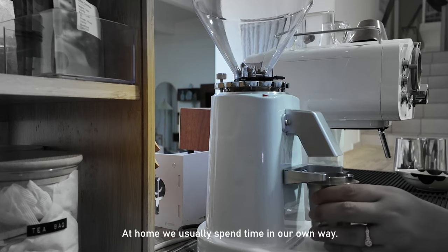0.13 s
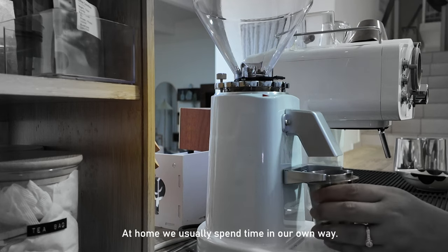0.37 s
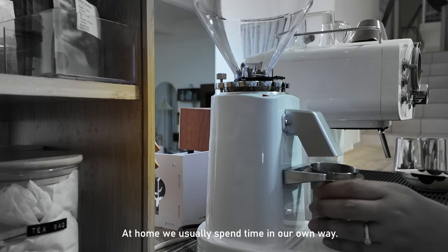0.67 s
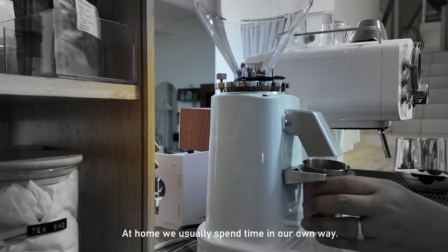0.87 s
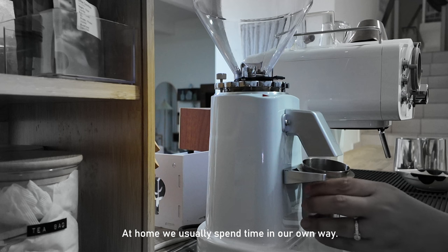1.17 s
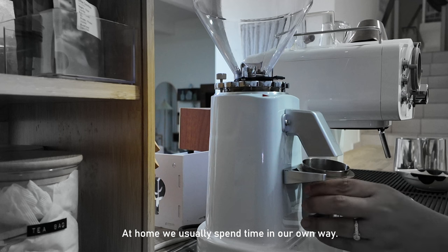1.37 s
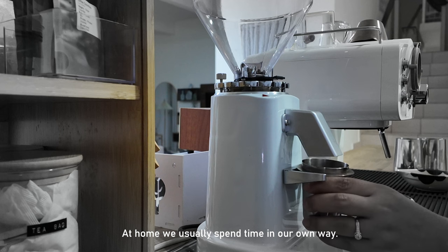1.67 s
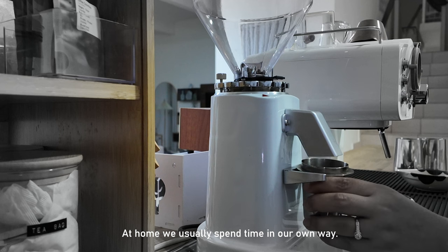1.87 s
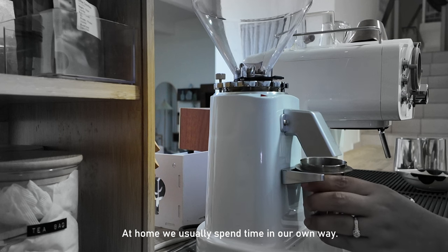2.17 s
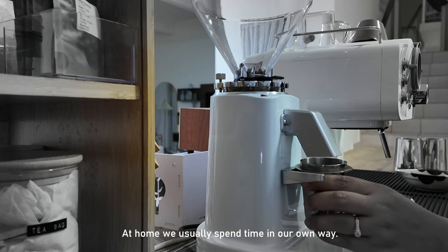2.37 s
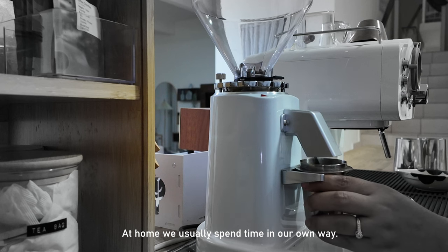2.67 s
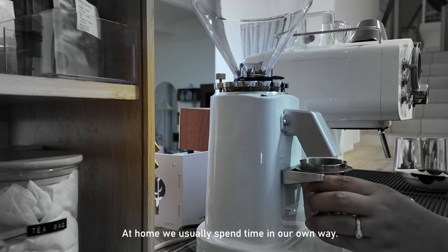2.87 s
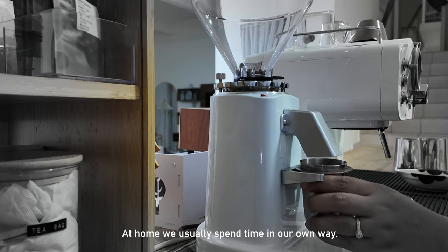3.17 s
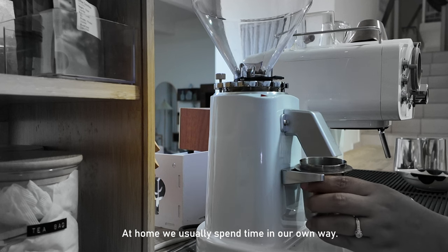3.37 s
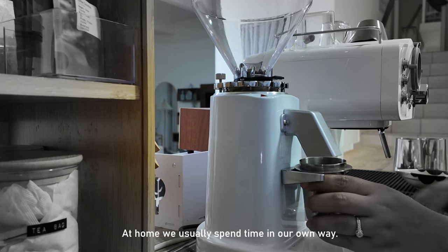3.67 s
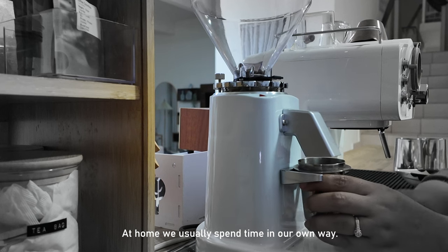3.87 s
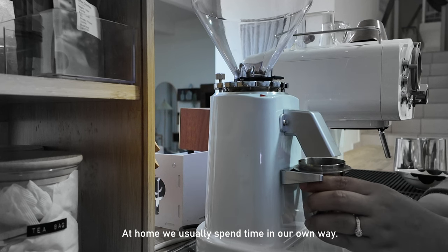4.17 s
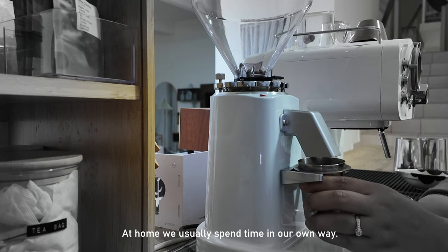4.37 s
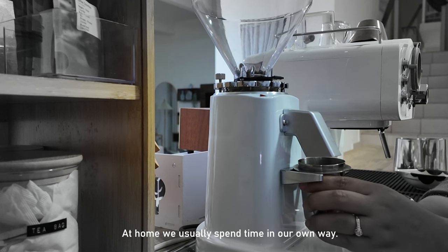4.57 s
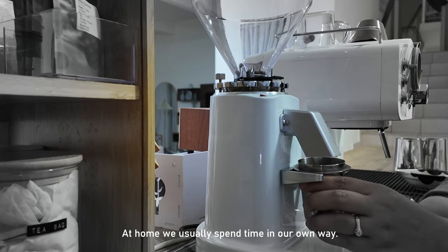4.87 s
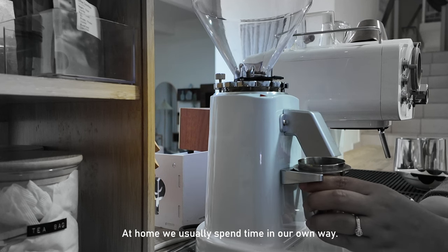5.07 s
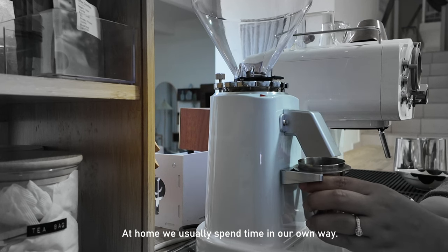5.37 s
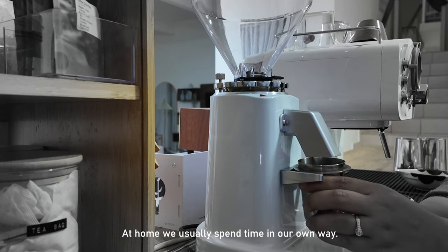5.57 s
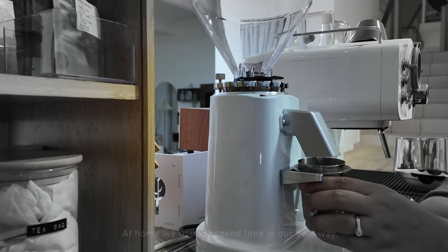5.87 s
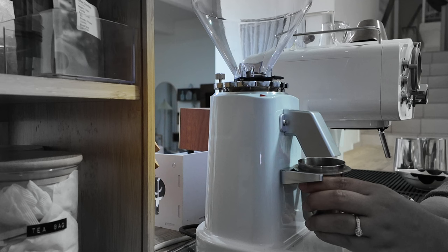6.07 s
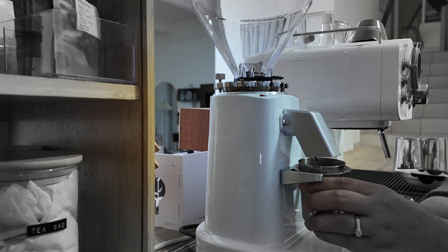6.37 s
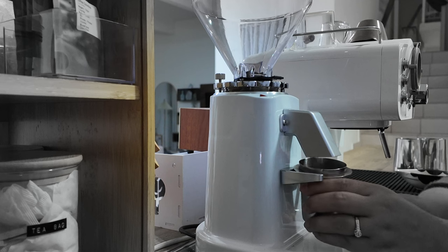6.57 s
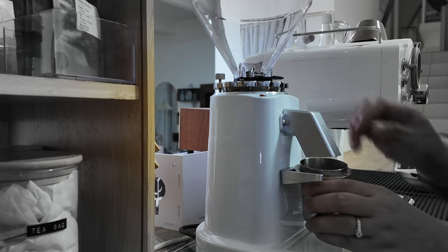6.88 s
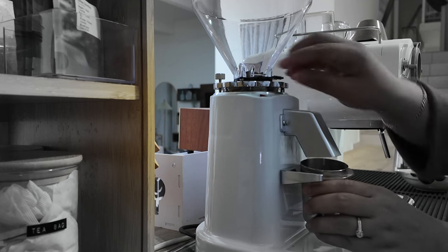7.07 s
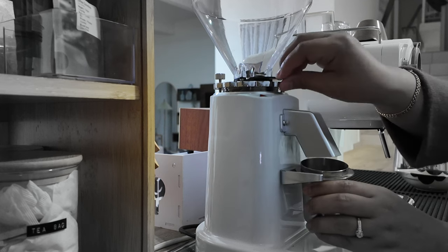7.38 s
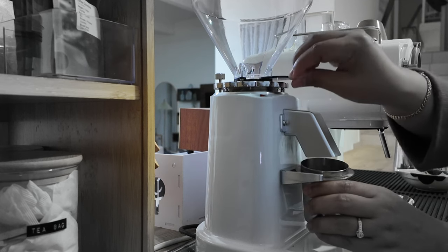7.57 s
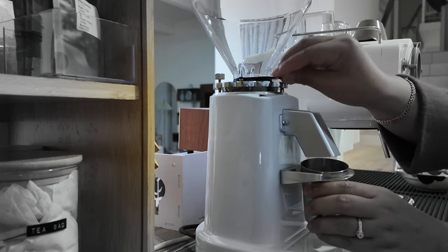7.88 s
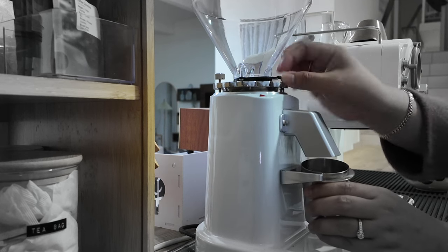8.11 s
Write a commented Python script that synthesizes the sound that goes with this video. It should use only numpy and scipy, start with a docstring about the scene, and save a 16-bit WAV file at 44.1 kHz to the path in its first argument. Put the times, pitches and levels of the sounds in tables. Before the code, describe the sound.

Close stereo view of a home kitchen with low rumble and thin hiss. A steel filter holder taps, then clunks loudly against a grinder's fork. A sharp knock starts a very short, loud grind with cracking beans; after a pause a longer run roars and whines, then coasts down quickly. Finally, a hand turns the grinder's collar with delicate clicks and dry scrapes.

```python
"""Burr grinder on a kitchen counter

An electric grinder runs twice: beans crack between the burrs as filtered noise and rough sine bursts, the teeth
whine at a pitch that follows the shaft, and the motor hums at twice the mains rate. A steel filter holder knocks
as decaying modes over noise; at the end a hand turns the clicking, scraping grind collar. Soft rumble and hiss
run throughout; decaying noise makes the room's answer to the grinding and the handling."""
import sys
import numpy as np
from scipy import signal
from scipy.fft import rfft, irfft, next_fast_len
from scipy.io import wavfile
from scipy.ndimage import uniform_filter1d, map_coordinates

SR = 44100
rng = np.random.default_rng(int(sys.argv[2]) if len(sys.argv) > 2 else 0)


def to_wav(s):
    """Save 16-bit WAV."""
    ch = np.atleast_2d(s).T  # columns
    pcm = np.round(np.clip(ch, -1, 1) * 32767)  # PCM
    wavfile.write(sys.argv[1], SR, pcm.astype(np.int16))


N = 363560
T = np.arange(N) / SR

# motor runs: (on [s], off [s], burrs stall [s])
RUNS = [(2.201, 2.577, 2.694), (3.897, 6.561, 6.635)]
# modes of the grind collar: (frequency [Hz], relative level [dB], t60 [s])
COLLAR_MODES = [(681, 1, 0.12), (848, 3, 0.086), (1100, 0.5, 0.12), (1966, 0.5, 0.11), (2440, 2.5, 0.16),
                (3700, -1.5, 0.094), (4380, -3, 0.054), (9520, -3.5, .06)]
FULL_TEETH_HZ = 2245  # mean tooth rate at full speed
CRACK_T60_S = 0.055  # noise in a contact


def amp(db):
    """Amplitude ratio of a level in dB."""
    return 10 ** (np.asarray(db) / 20)


def unit(x):
    """x scaled to an rms of 1."""
    return x / np.sqrt(np.mean(x ** 2) + 1e-20)


def along(points, hz):
    """Interpolates (frequency [Hz], value) points on a log frequency axis."""
    f, v = np.transpose(points)
    return np.interp(np.log(hz + 1), np.log(f + 1), v)


def wobble(rate_hz):
    """Smooth random curve with rate_hz knots a second."""
    knots = rng.standard_normal(int(N * rate_hz / SR) + 4)
    return map_coordinates(knots, [T * rate_hz])


def filtered(x, response):
    """x shaped by a complex response of frequency."""
    m = next_fast_len(N + SR)
    return irfft(rfft(x, m) * response(np.fft.rfftfreq(m, 1 / SR)), m)[..., :N]


def causal(gain):
    """Minimum-phase response with this gain, by folding the cepstrum."""
    cepstrum = irfft(np.log(gain + 1e-6))
    half = len(cepstrum) // 2
    cepstrum[1:half] *= 2
    cepstrum[half + 1:] = 0
    return np.exp(rfft(cepstrum))


def patchy(depth_db):
    """White noise with patches of random gain in time and frequency."""
    z = signal.stft(rng.standard_normal(N), nperseg=256)[2]
    field = uniform_filter1d(rng.standard_normal(z.shape), size=4, axis=0)
    field = uniform_filter1d(field, size=8, axis=1)
    return signal.istft(z * amp(depth_db * unit(field)), nperseg=256)[1][:N]


def air():
    """Drifting low household rumble, nearly mono, and a thin wide hiss."""
    # background drift: (time [s], rumble level [dB], hiss level [dB])
    drift = [(0.05, -36, -61), (0.4, -38, -62.5), (0.9, -37.5, -61.5), (1.9, -39, -62.5), (3.0, -40, -66.5),
             (3.45, -37.5, -61), (6.9, -39.5, -63), (7.35, -37, -60), (7.65, -36.5, -65), (8.2, -39, -60)]
    # spectra: (frequency [Hz], relative density [dB])
    rumble_spectrum = [(12, -77.5), (20, -48.5), (43, -33), (54, -18), (102, 4.5), (125, -8.5), (151, -3),
                       (229, -8.5), (256, -13), (335, -18), (524, -29.5), (743, -28.5), (900, -43.5),
                       (1170, -80.5), (1980, -120)]
    hiss_spectrum = [(290, -31.5), (500, -27), (748, -2.5), (863, -10.5), (969, -3), (1040, -4.5),
                     (1350, -3.5), (5670, -17), (15500, -27)]
    # stereo width: (frequency [Hz], side minus mid [dB])
    air_width = [(60, -32), (110, -31.5), (200, -22.5), (380, -12), (700, -7.5), (1290, -5), (2380, -2),
                 (4400, 2.5), (8120, -1), (15000, -3)]
    s, *levels = np.transpose(drift)
    rumble_db, hiss_db = (np.interp(T, s, db) for db in levels)
    rumble_db = rumble_db + 0.7 * wobble(5)
    out = 0
    for level_db, spectrum in ((rumble_db, rumble_spectrum), (hiss_db, hiss_spectrum)):
        shape = lambda hz: amp(along(spectrum, hz) + along(air_width, hz) * [[0], [1]])
        mid, side = filtered(rng.standard_normal((2, N)), shape)
        out = out + amp(level_db) * np.array([mid + side, mid - side]) / np.std(mid)
    return out


def struck(events, modes, crack_t60_s, ring_db, loose_hz, body_hz, sharp):
    """Contacts ring modes over a crack of noise, loose parts waver them; a tick band and a low body band colour it."""
    out, t = np.zeros(N + SR), np.arange(SR // 3) / SR
    hz = np.fft.rfftfreq(len(t), 1 / SR) + 1
    f, level_db, t60_s = np.transpose(modes)[:, :, None]
    body = 1 / np.sqrt((1 + (body_hz[0] / hz) ** 6) * (1 + (hz / body_hz[1]) ** 6))
    for s, tick_db, tick_hz, body_db in events:
        steps = rng.standard_normal((len(modes), len(t)))
        waver = np.cumsum(steps, axis=1) * np.sqrt(2 * np.pi * loose_hz / SR)  # phase walk
        ring = (amp(level_db - 60 * t / t60_s) * np.sin(2 * np.pi * f * t + waver)).sum(0)
        crack = amp(-60 * t / crack_t60_s) * rng.standard_normal(len(t))
        sound = (amp(ring_db) * ring + crack) * np.minimum(t / 0.00062, 1)
        tick = 1 / np.sqrt(1 + (sharp * (hz / tick_hz - tick_hz / hz)) ** 2)
        tick = tick / (1 + (hz / 15000) ** 4)
        colour = np.hypot(amp(tick_db) * tick, amp(body_db) * body)
        out[round(s * SR):][:len(t)] += irfft(rfft(sound) * causal(colour))
    return out[:N]


def filter_holder():
    """Steel filter holder knocking on fork and switch, ringing its modes."""
    # contacts: (time [s], tick gain [dB], tick pitch [Hz], body gain [dB])
    knocks = [(0.237, -10.5, 2040, -27.5), (0.242, -35, 3000, -37), (0.255, -29, 1600, -36),
              (0.535, -39, 1720, -32), (0.884, -5, 1810, -1.5), (0.897, -8.5, 2770, -15.5),
              (0.907, -24, 910, -25), (0.927, -13.5, 700, -19.5), (0.959, -33, 2800, -26),
              (0.994, -34.5, 2500, -19.5), (1.079, -43, 1900, -35), (1.133, -52, 1500, -33.5),
              (2.199, -7.5, 4530, -16), (3.513, -55, 2800, -41.5), (3.808, -43, 4550, -46),
              (3.899, -21, 2520, -20), (6.765, -24.5, 1500, -27)]
    # holder modes: (frequency [Hz], relative level [dB], t60 [s])
    holder_modes = [(228, 5.5, 0.11), (267.8, 2, 0.18), (333, -7, 0.23), (647, 0.5, 0.27), (732, 2, 0.17),
                    (961, -2.5, 0.15), (1382, -5, 0.13), (2290, -6.5, 0.076), (3400, -10.5, .07),
                    (3805, -11, 0.1), (7120, -5, 0.077)]
    return struck(knocks, holder_modes, CRACK_T60_S, ring_db=-13, loose_hz=15, body_hz=(200, 1000), sharp=1.9)


def answer(near_t60_s, late_db):
    """Room impulse response: short noise off close surfaces plus a tail whose treble dies sooner."""
    # tail decay: (frequency [Hz], t60 [s])
    tail_t60 = [(200, 1), (1000, 0.74), (4500, 0.57), (10000, 0.44)]
    hz, t, z = signal.stft(rng.standard_normal(SR), SR, nperseg=256)
    decay = amp(-60 * t / along(tail_t60, hz)[:, None])
    late = signal.istft(z * decay, SR, nperseg=256)[1][:SR]
    near = rng.standard_normal(SR) * amp(-60 * T[:SR] / near_t60_s)
    return near / np.linalg.norm(near) + amp(late_db) * late / np.linalg.norm(late)


def kitchen(x, other, hand):
    """Mid: direct sound and answer. Side, weak in bass: frequency-dependent lags, and reflections off the walls."""
    # stereo width: (frequency [Hz], side minus mid [dB])
    near_width = [(60, -29.5), (110, -29.5), (200, -22.5), (380, -6.5), (700, -1.5), (1290, 0), (2380, -2),
                  (4400, 0), (8120, -0.5), (15000, -1)]
    # stereo balance: (frequency [Hz], left minus right [dB])
    balance = [(60, 0), (1300, -.3), (2400, -2.5), (4400, -.5), (15000, -.5)]
    room_db, hand_wet_db = -11, -4.5  # hands are nearer than the burrs: less room in mid
    source = x + amp(hand_wet_db) * hand
    wet = signal.fftconvolve(source, answer(near_t60_s=0.045, late_db=-1.5))[:N]
    mid = x + hand + amp(room_db) * wet
    walls = signal.fftconvolve(other + hand, answer(near_t60_s=0.067, late_db=-15.0))[:N]
    knots = np.tanh(3 * rng.standard_normal(size=150))

    def share(hz):
        """Side gains of mid and walls; the walls take over above 2200 Hz."""
        lag = 1j * np.interp(hz, np.linspace(0, SR / 2, num=len(knots)), knots)
        angle = np.arctan(hz / 2200)
        return np.array([lag * np.cos(angle), np.sin(angle)]) * amp(along(near_width, hz))

    side = filtered(np.array([mid, walls]), share).sum(0)
    left_right = np.array([mid + side, mid - side])
    return filtered(left_right, lambda hz: amp(along(balance, hz) * [[0.5], [-0.5]]))


def motor():
    """The field pulls twice a mains cycle, giving hum and overtones; a jolt at switch-on swells them."""
    # hum partials: (frequency [Hz], mean peak level after the jolt [dB])
    partials = [(100, -28), (200, -33.5), (300, -41), (500, -55)]
    on = uniform_filter1d(sum((T > a) & (T < b) for a, b, _ in RUNS) * 1., size=900)
    hum = sum(amp(db + 0.4 * wobble(13.0)) * np.sin(2 * np.pi * hz * T + 0.099 * wobble(6.3))
              for hz, db in partials)
    inrush = sum(np.where(T > a, amp(-60 * np.abs(T - a) / 0.19), 0) for a, *_ in RUNS)
    return on * hum * (1 + 2.0 * inrush)


def shaft():
    """Mean tooth rate [Hz] and grinding amplitude: exponential spin-up and coast, with a louder first bite."""
    first_teeth_hz = 1480  # as the first beans are caught
    spin_up_s, coast_s = 0.058, 0.092  # time constants
    crush_db, attack_s = -15.5, 0.014
    bite_peak_db, bite_s = 6.5, 0.02
    coast_db_per_s, stall_db_per_s = 72.5, 360.5  # the stall adds its fall to the coast
    rate_hz, level = np.zeros(N), np.zeros(N)
    for on, off, stall in RUNS:
        since, coasting, stalled = (np.maximum(T - s, 0) for s in (on, off, stall))
        run_hz = FULL_TEETH_HZ - (FULL_TEETH_HZ - first_teeth_hz) * np.exp(-since / spin_up_s)
        rate_hz = np.where(T > on, run_hz * np.exp(-coasting / coast_s), rate_hz)
        bite_db = bite_peak_db / (1 + (since / bite_s) ** 8)
        fall_db = coast_db_per_s * coasting + stall_db_per_s * stalled
        level += np.minimum(since / attack_s, 1) ** 2 * amp(crush_db + bite_db - fall_db)
    return rate_hz, level


def case(hz):
    """Body gain: resonances on a broad slope, cut where the body is too small to radiate."""
    # resonances of hopper, chute and case: (frequency [Hz], width [Hz], relative level [dB])
    resonances = [(147.5, 42, -4), (250, 40, -9), (700, 77, -16), (1014, 34, 1), (1200, 76, -5.5),
                  (1370, 67, -10), (1754, 95, -4.5), (2070, 120, 0), (2418, 290, -10), (2960, 810, -17.5),
                  (3398, 51, -10), (4325, 160, -6.5), (4867, 100, -12), (9200, 260, -29.5),
                  (9200, 170, -20.5), (9960, 350, -21)]
    # slope between them: (frequency [Hz], relative density [dB])
    slope = [(20, -60), (40, -51.5), (65, -30.5), (110, -14), (290, -10), (520, -15.5), (695, 2.5),
             (890, -7.5), (1220, 2.5), (2260, 1.5), (3640, -10), (4480, -10), (5510, -16), (8000, -19),
             (14000, -22.5), (15500, -26.5)]
    foot_hz = 52
    peaks = sum(amp(db) ** 2 / (1 + (2 * (hz - c) / w) ** 2) for c, w, db in resonances)
    radiation = (hz ** 4 + 1) / (hz ** 4 + foot_hz ** 4)
    return np.sqrt(peaks + amp(along(slope, hz) - 5.5) ** 2) * radiation


def burrs():
    """Dense uneven cracks shake the body, teeth whine, load swells once a turn; two rows for two body parts."""
    # whine partials: (multiple of tooth rate, relative level at full speed [dB], smear rate [Hz])
    whine_partials = [(1, 0, 100), (2, -3, 330), (3, -14, 520), (4, -22, 600)]
    # path of the whine: (frequency [Hz], gain [dB])
    chute_gain = [(500, -22), (1000, -7.5), (1600, -3.5), (2400, -0.5), (3300, -12.5), (4100, 0.5),
                  (4700, 3), (5600, -4), (6700, 7.5), (10000, 0)]
    teeth_per_turn, cracks_per_s = 96, 500
    rate_hz, level = shaft()
    slowed = 1 - rate_hz / FULL_TEETH_HZ
    treble_db = 5 - 6.5 * slowed
    whine_db = -8 - 1 * slowed
    rate_hz = rate_hz * (1 + 0.008 * wobble(14) + 0.011 * wobble(4.5))  # load wavers the speed
    tooth_phase = 2 * np.pi * np.cumsum(rate_hz) / SR
    turn_swell = np.sin(tooth_phase / teeth_per_turn + 2.0 * wobble(3))
    level = level * amp(0.41 * wobble(9) + 0.49 * turn_swell + 0.71 * wobble(45))

    cracks = (rng.random(N) < cracks_per_s / SR) * amp(10 * rng.random(N)) * rng.standard_normal(N)
    grit = np.array([patchy(depth_db=1.63), patchy(depth_db=3.5)])
    grit = unit(unit(grit) + 0.4 * unit(cracks))
    treble = filtered(grit, lambda hz: hz ** 4 / (hz ** 4 + 5000 ** 4))
    grit += treble * (amp(treble_db) - 1)
    scale = np.sqrt(np.mean(case(np.linspace(0, SR / 2, num=4000)) ** 2))
    crush = filtered(level * grit, lambda hz: causal(case(hz))) / scale

    # slow burrs sing a purer fundamental with fewer overtones
    speed = np.clip(rate_hz / FULL_TEETH_HZ, 0.65, 1)
    steady = 1.7 * np.clip(10 * (1 - speed), 0, 1)

    def partial(k, db, smear_hz):
        """One tooth harmonic smeared by random quadrature gains."""
        tone = (steady * (k == 1) + wobble(smear_hz)) * np.cos(k * tooth_phase)
        tone = tone + wobble(smear_hz) * np.sin(k * tooth_phase)
        return amp(db) * speed ** (3 * k - 5) * tone

    whine = np.array([sum(partial(*p) for p in whine_partials) for part in range(2)])
    whine = level * amp(whine_db) * whine
    return crush + filtered(whine, lambda hz: amp(along(chute_gain, hz)))


def snaps():
    """A whole bean breaks: five decaying sines scattered around its pitch make a short rough burst."""
    # loudest snaps: (time [s], level [dB], centre pitch [Hz])
    loudest = [(2.212, -2, 1457), (2.221, -7.5, 1238), (2.339, -4, 1046), (2.42, -17, 2260),
               (2.48, -10, 2050), (2.578, -7, 2120), (3.908, -7.5, 1902), (3.924, -2, 1715),
               (3.955, -14.5, 1984), (3.996, -11, 2043), (4.099, -9.5, 2058), (4.54, -16.5, 1684),
               (4.768, -8.5, 1255), (4.83, -10, 2200), (4.939, -15, 2100), (5.227, -14, 1693),
               (5.275, -6, 1298), (5.989, -10, 2008), (6.034, -11, 1777), (6.086, -4.5, 1277),
               (6.202, -10.5, 2023), (6.434, -6.5, 2242)]
    lesser_per_s, lesser_db, lesser_hz = 6, -19, 2050  # at random while the motor runs; mean level
    snap_t60_s, rise_s = 0.05, 0.0011
    out, t = np.zeros(N + SR), np.arange(SR // 20) / SR
    lesser = []
    for on, off, _ in RUNS:
        for a, b, c in rng.random((round(lesser_per_s * (off - on)), 3)):
            lesser.append((on + (off - on) * a, lesser_db + 8 * (b - 0.5), lesser_hz * amp(2 * (c - 0.5))))
    for s, db, hz in loudest + lesser:
        spread_hz = hz * amp(2.5 * rng.standard_normal(size=(5, 1)))
        sines = np.sin(2 * np.pi * (spread_hz * t + rng.random(spread_hz.shape)))
        burst = sines.sum(0) / np.sqrt(len(spread_hz))
        out[round(s * SR):][:len(t)] += amp(db - 60 * t / snap_t60_s) * np.minimum(t / rise_s, 1) * burst
    return out[:N]


def collar_clicks():
    """Detents of the turning collar click and ring its modes."""
    # detents: (time [s], tick gain [dB], tick pitch [Hz], body gain [dB])
    detents = [(7.23, -33, 2642, -31), (7.368, -35, 3320, -55), (7.431, -44, 5000, -45),
               (7.4645, -31.5, 4960, -53), (7.574, -24, 3780, -42), (7.5927, -18, 3000, -12),
               (7.637, -27.5, 5500, -46), (7.809, -38.5, 5500, -34.5), (7.9045, -26, 2770, -21.5),
               (7.922, -34, 2780, -23), (7.947, -29, 1950, -31), (8.16, -47, 3000, -55)]
    return struck(detents, COLLAR_MODES, CRACK_T60_S, ring_db=-11.5, loose_hz=44.7, body_hz=(560, 1100), sharp=1.9)


def rubbing():
    """The collar scrapes in its thread in small uneven grains that set its modes singing."""
    # slides: (start [s], end [s], level at the end [dB])
    strokes = [(7.366, 7.463, -49.5), (7.489, 7.638, -39.5), (7.789, 7.926, -42)]
    # scrape spectrum: (frequency [Hz], relative density [dB])
    thread_spectrum = [(880, -48), (1500, -30), (1920, -8.5), (2450, -10.5), (2700, -7.5), (4150, -0.5),
                       (4990, -5.5), (7530, -18.5), (9150, -7), (15500, -20.5)]
    rise_s, swell_db_per_s, let_go_db_per_s = 0.02, 80.5, 400  # pressed harder to the end, then let go
    sing_db, sing_width_hz = 6, 129.5
    level = 0
    for a, b, db in strokes:
        slope_db_per_s = np.where(T < b, swell_db_per_s, let_go_db_per_s)
        level = level + np.clip((T - a) / rise_s, 0, 1) * amp(db - slope_db_per_s * np.abs(T - b))

    def colour(hz):
        """Thread spectrum with the collar's modes standing out."""
        peaks = sum(amp(sing_db + db) ** 2 / (1 + (2 * (hz - c) / sing_width_hz) ** 2)
                    for c, db, _ in COLLAR_MODES)
        return amp(along(thread_spectrum, hz)) * np.sqrt(1 + peaks)

    grains = patchy(depth_db=5) * amp(2.5 * wobble(260))
    return level * unit(filtered(grains, colour))


def scene():
    """Grinding and handling heard in the kitchen, plus the dry motor hum and the air."""
    hand = filter_holder() + collar_clicks() + rubbing()
    part, other_part = burrs() + snaps()
    return kitchen(part, other_part, hand) + motor() + air()


def record(dry):
    """Input stage: adds hiss, clips softly at full scale, drops the deepest bass and cuts at its band limit."""
    hiss_db, bass_cut_hz, top_hz = -69.5, 18, 15670
    noisy = dry + amp(hiss_db) * rng.standard_normal(dry.shape)
    clipped = noisy / (1 + np.abs(noisy) ** 8) ** (1 / 8)
    return filtered(clipped, lambda hz: (hz < top_hz) * hz ** 2 / (hz ** 2 + bass_cut_hz ** 2))


dry = scene()
out = record(dry)
to_wav(out)
```